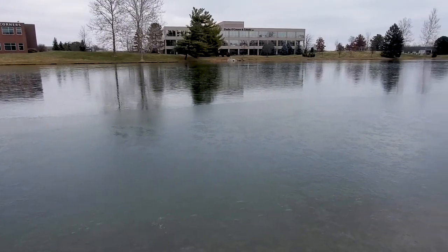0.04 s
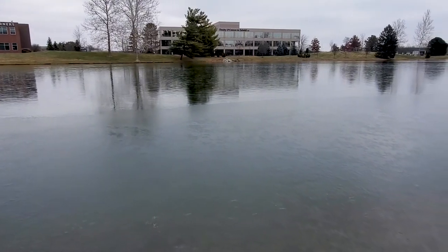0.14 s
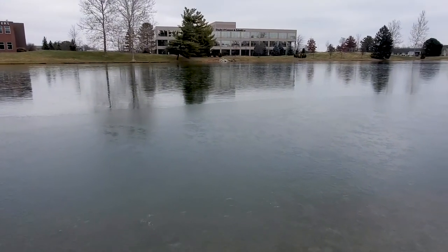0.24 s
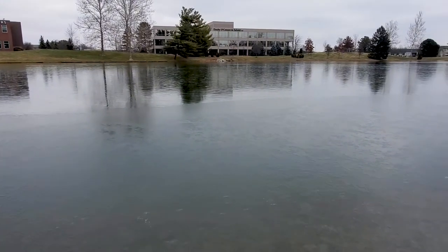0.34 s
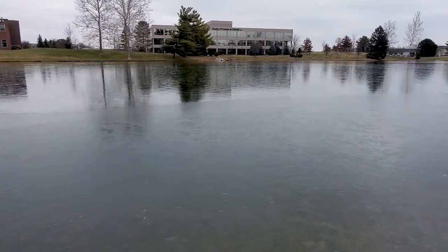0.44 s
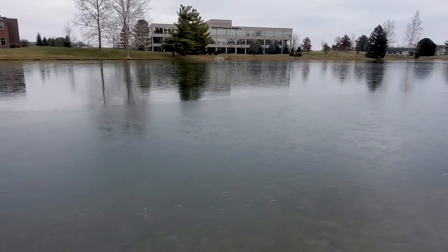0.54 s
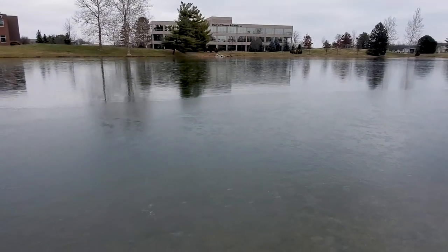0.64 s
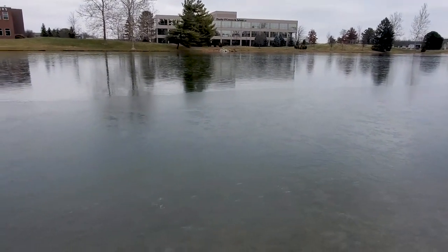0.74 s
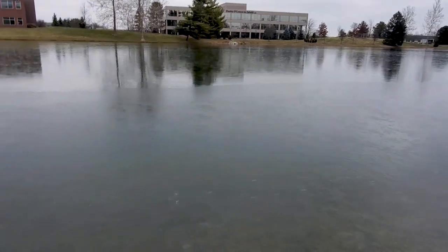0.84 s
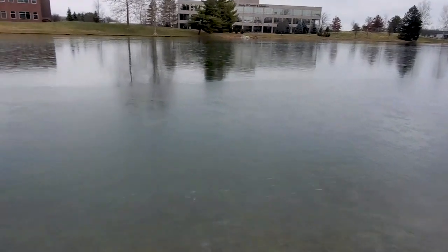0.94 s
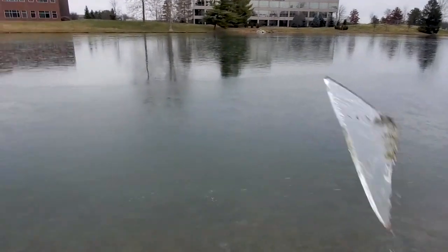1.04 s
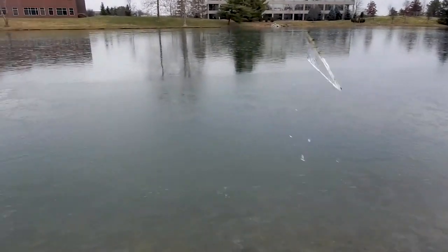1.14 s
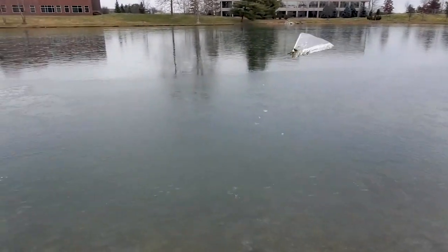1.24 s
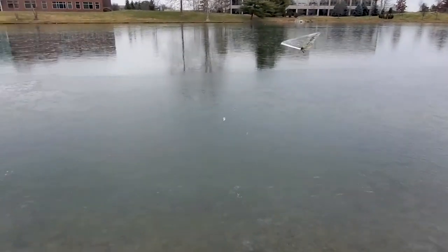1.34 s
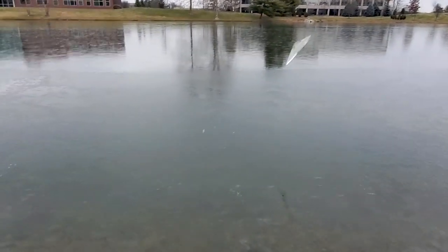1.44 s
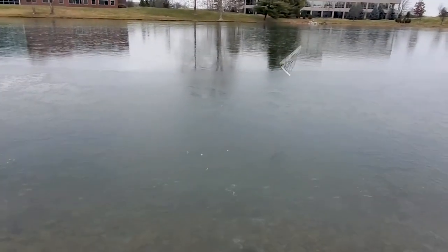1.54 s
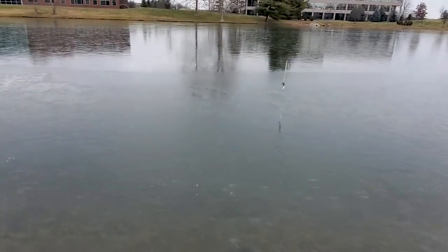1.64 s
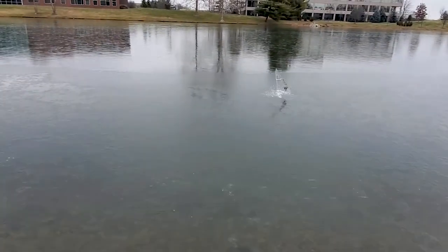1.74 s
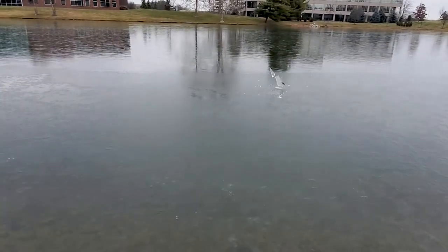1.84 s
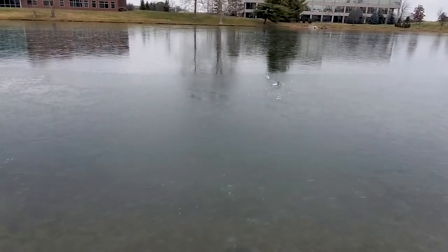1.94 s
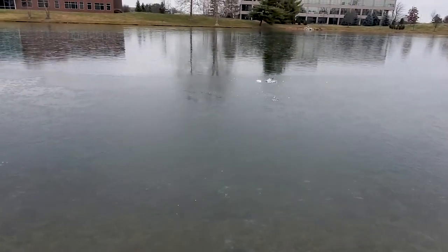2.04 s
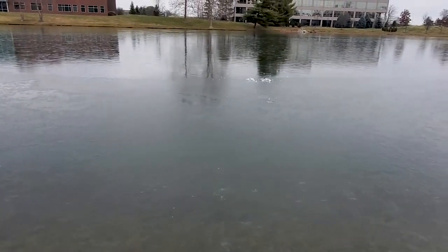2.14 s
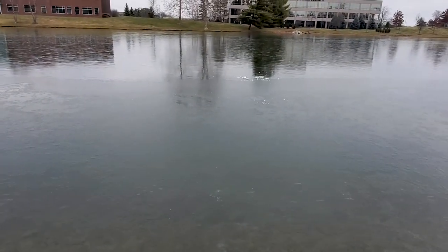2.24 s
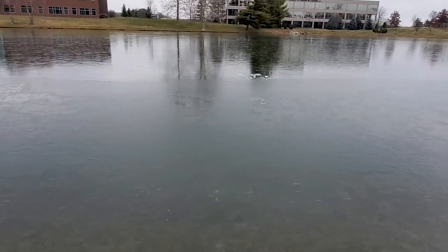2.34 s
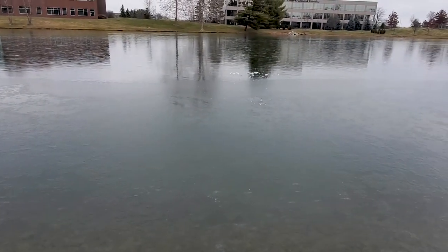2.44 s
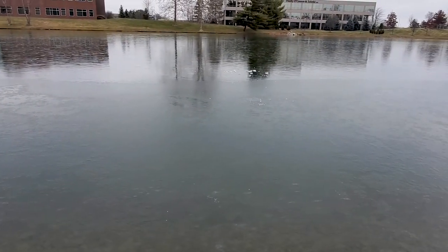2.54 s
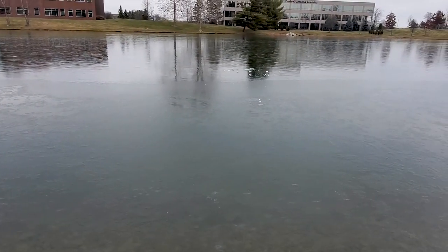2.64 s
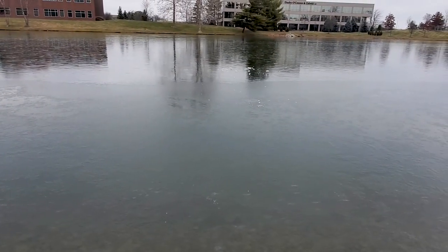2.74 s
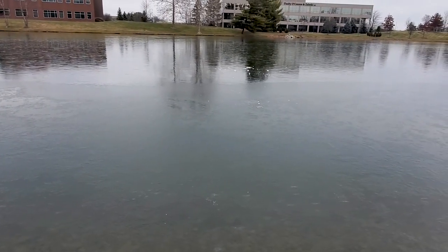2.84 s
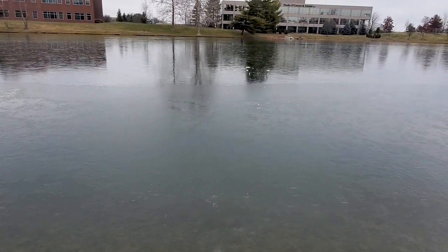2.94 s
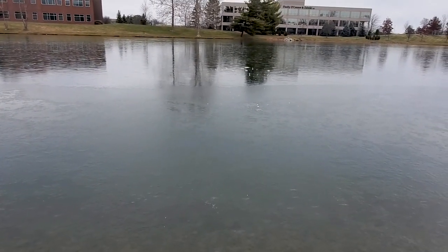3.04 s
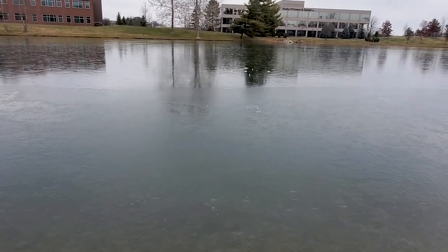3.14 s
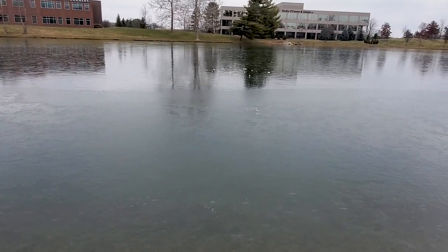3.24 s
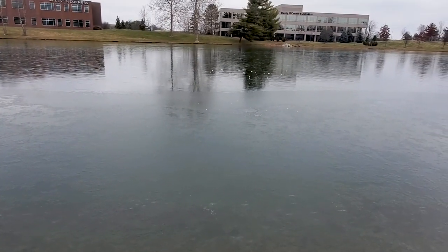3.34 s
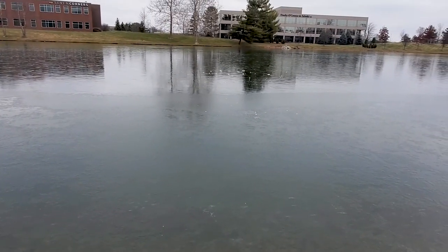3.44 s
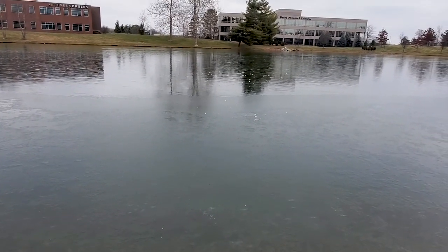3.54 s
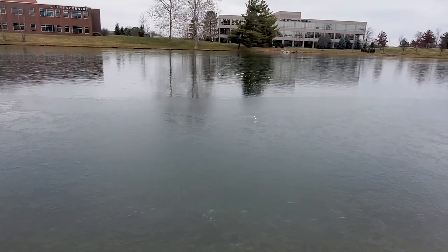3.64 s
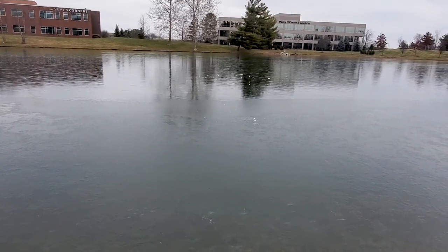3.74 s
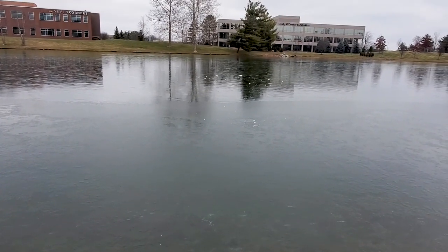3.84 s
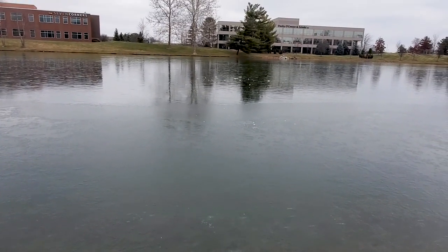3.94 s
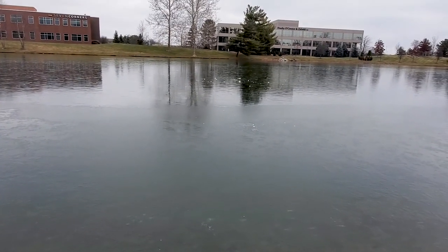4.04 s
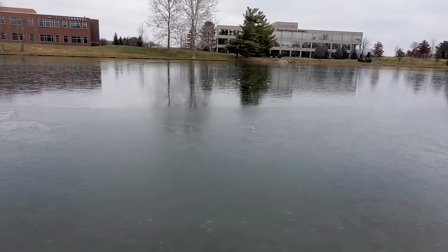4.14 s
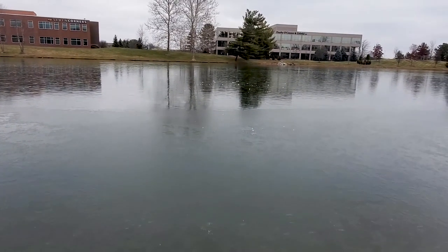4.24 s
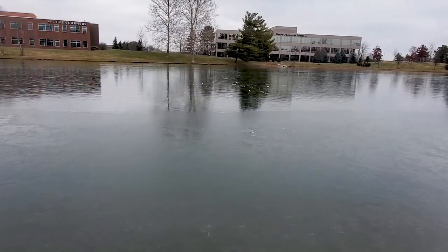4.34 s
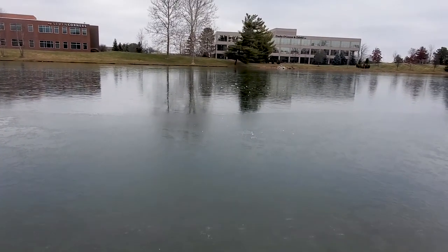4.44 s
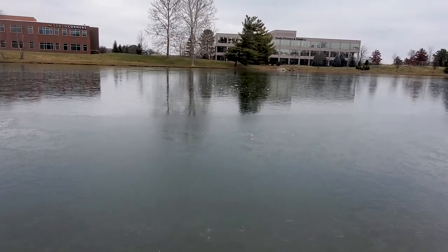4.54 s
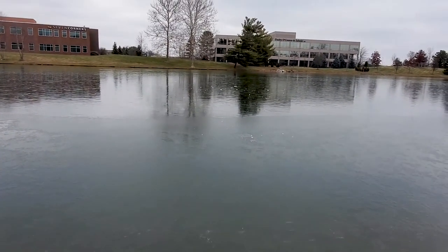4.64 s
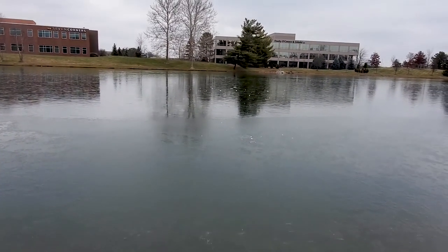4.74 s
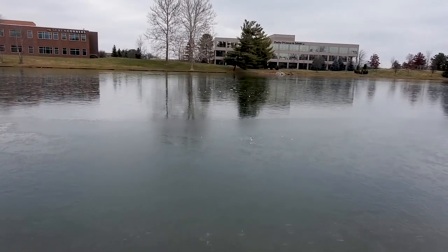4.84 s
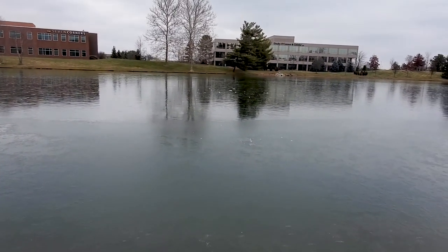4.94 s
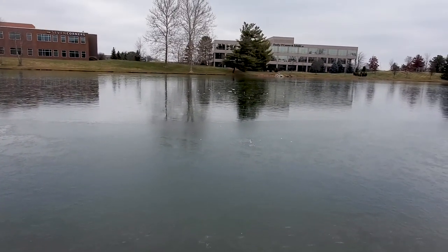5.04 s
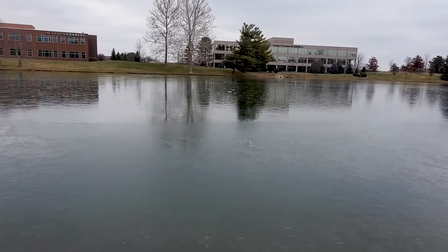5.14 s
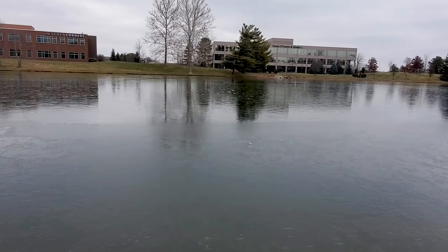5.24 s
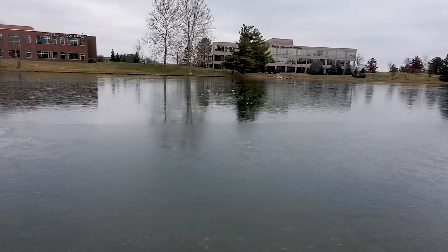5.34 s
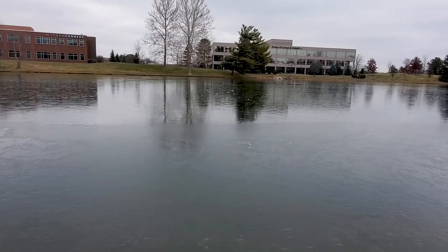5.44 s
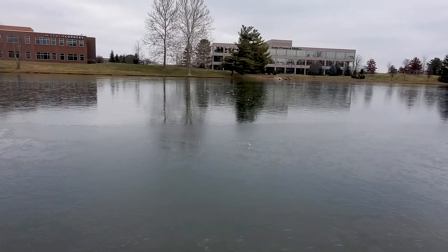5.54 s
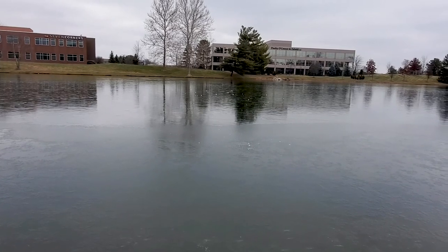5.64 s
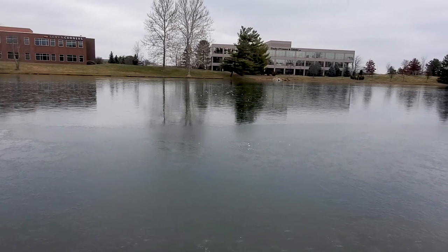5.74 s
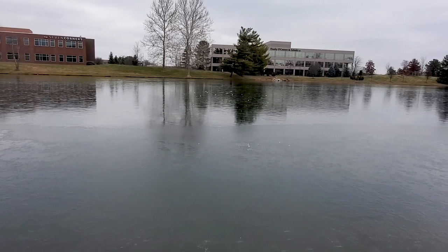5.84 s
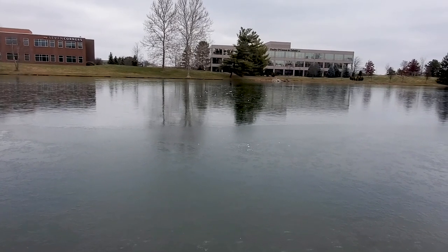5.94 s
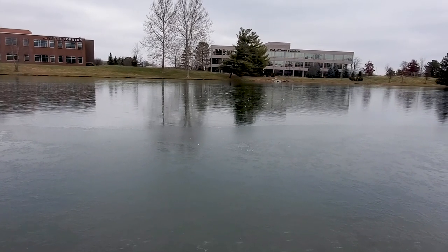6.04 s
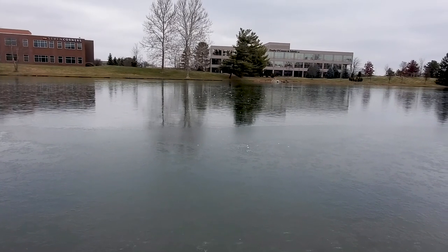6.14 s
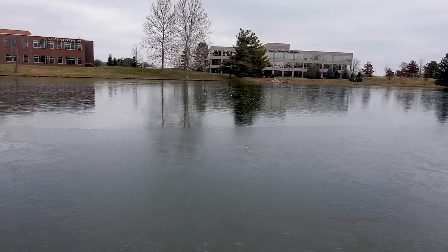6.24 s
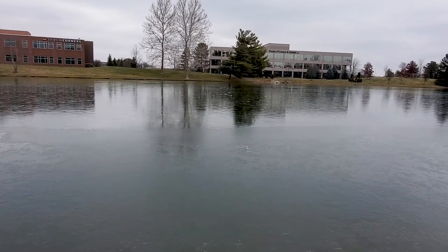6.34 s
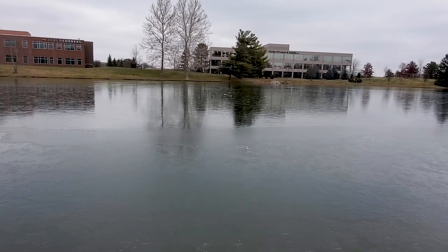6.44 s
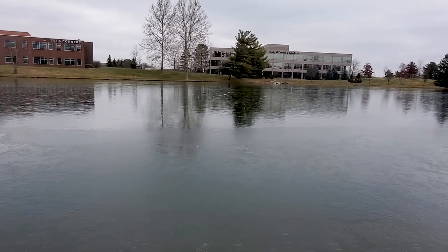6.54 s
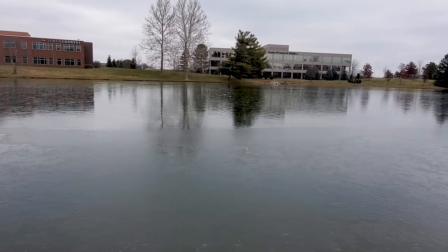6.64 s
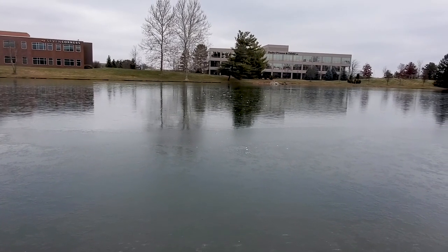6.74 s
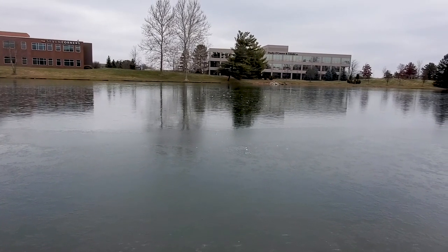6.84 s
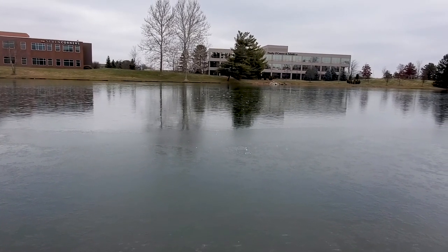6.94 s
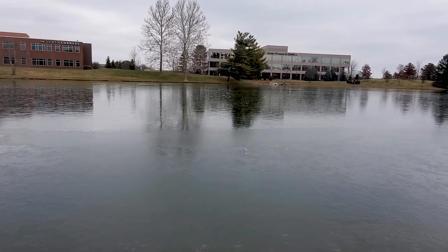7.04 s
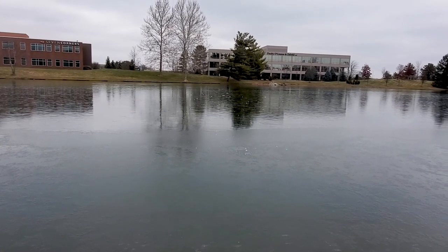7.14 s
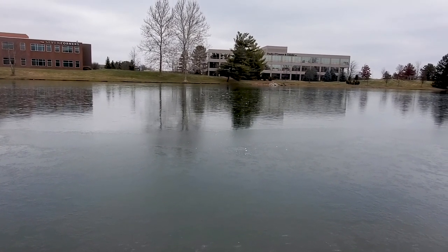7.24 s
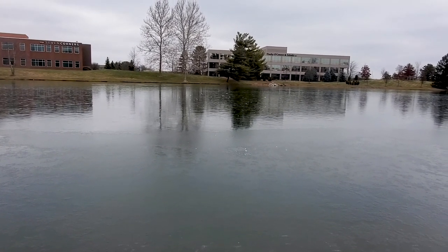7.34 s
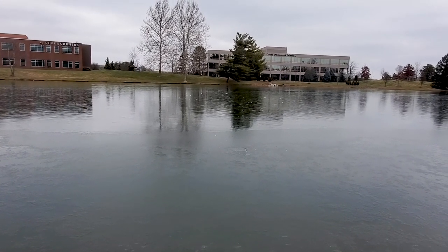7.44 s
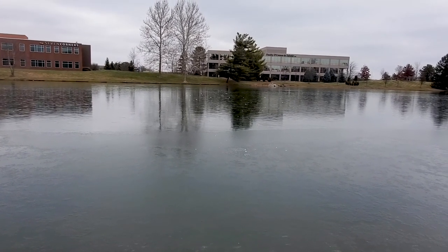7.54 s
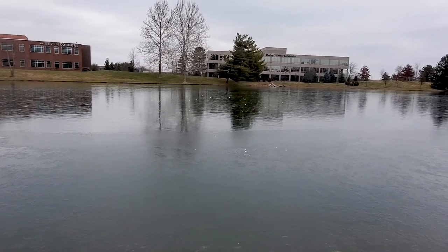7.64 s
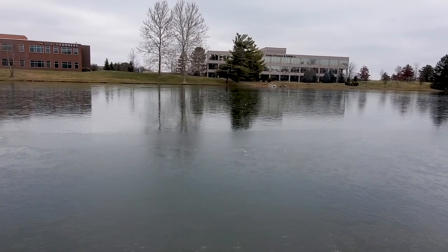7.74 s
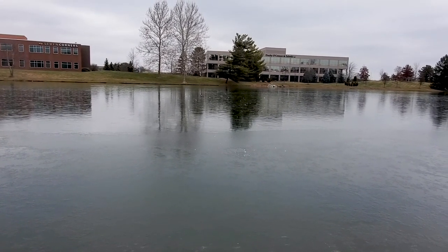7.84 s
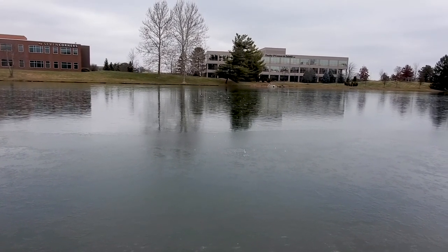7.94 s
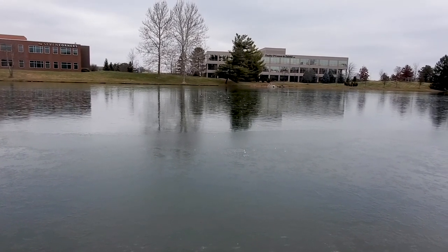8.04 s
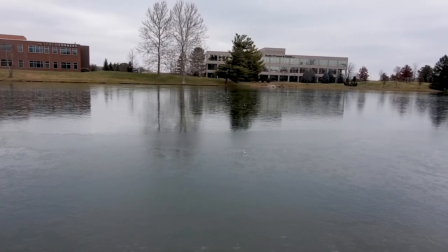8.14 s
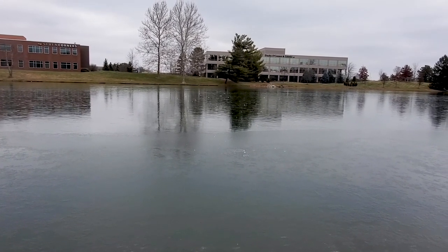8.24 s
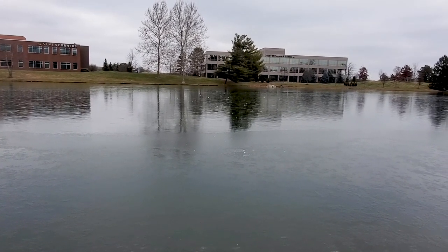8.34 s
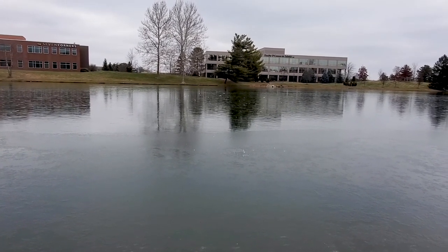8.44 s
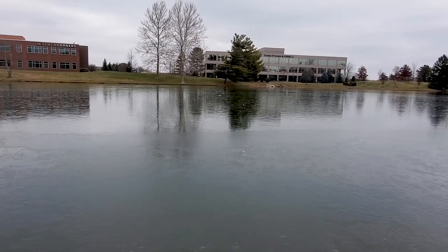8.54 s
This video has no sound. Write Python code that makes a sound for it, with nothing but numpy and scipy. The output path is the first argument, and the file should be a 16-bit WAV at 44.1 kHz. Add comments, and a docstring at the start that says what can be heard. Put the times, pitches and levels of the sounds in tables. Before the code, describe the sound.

A plate of ice is flung with a quick swish close to the microphone. It hits a thinly frozen pond, bounces and shatters in a cluster of sharp clicks and falling chirps. The shards skate away for several seconds, their tiny ticks merging into a high, glassy whir that slowly sinks in pitch and dulls with distance. A low outdoor rumble and faint distant traffic lie underneath.

```python
"""A plate of ice, flung with a swish onto a thinly frozen pond, strikes, bounces, rings and shatters.
Bending waves in the sheet are dispersive and outrun sound in air, so each blow starts with a falling
chirp. The shards skate away for seconds: their countless ticks merge into a whir and a zing that sinks
in pitch, and the slide dulls with distance. Beneath lie a low outdoor rumble and distant traffic."""
import sys
import numpy as np
from scipy import signal
from scipy.fft import rfft, irfft, next_fast_len
from scipy.io import wavfile
from scipy.ndimage import uniform_filter1d, map_coordinates

SR = 44100
rng = np.random.default_rng(int(sys.argv[2]) if len(sys.argv) > 2 else 0)


def log_audio(samples):
    """Write samples as a 16-bit WAV file to the path given in sys.argv[1]."""
    # one column per channel
    frames = np.atleast_2d(samples).T
    # limit to full scale, then quantise
    limited = np.clip(frames, -1, 1)
    pcm = np.round(limited * 32767).astype(np.int16)
    wavfile.write(sys.argv[1], SR, pcm)


N = 378378
TIME = np.arange(N) / SR

# background levels (time [s], rumble [dB], drone [dB], traffic [dB])
BACKGROUND_LEVELS = [(0, -38, -44.5, -48.5), (.95, -36, -29.5, -48), (1.5, -36.5, -34.5, -49.5),
                     (2.1, -44.5, -54, -52), (3, -42, -63, -52), (3.5, -41.5, -43.5, -50),
                     (4.8, -39.5, -43.5, -52), (5.9, -41, -57, -53), (7.5, -40, -47.5, -54),
                     (8.58, -41.5, -51, -53.5)]
# spectrum of the outdoor rumble (frequency [Hz], level [dB])
RUMBLE_SPECTRUM = [(13, -50), (22, -28), (51, -8), (71, 0.5), (84, -2), (139, -15), (193, -16), (400, -34),
                   (520, -40), (880, -120)]
# spectrum of distant traffic (frequency [Hz], level [dB])
TRAFFIC_SPECTRUM = [(100, -7), (250, 3.5), (400, 1), (800, 1), (1200, -4), (2200, -4.5), (3000, -13),
                    (4200, -29), (6000, -28.5), (7200, -46.5), (8200, -31), (10000, -44), (15800, -39)]
# spectrum of the rushing air (frequency [Hz], level [dB])
SWISH_SPECTRUM = [(71, -24), (120, -13), (226, -11), (555, -5), (640, -12), (754, -15), (1180, -16),
                  (1360, -4.5), (1710, -18), (2180, -7.5), (2570, -12), (3020, -11), (6980, -24.5),
                  (11600, -28), (15800, -42)]
# resonances of the swish (frequency [Hz], bandwidth [Hz], relative level [dB])
SWISH_RESONANCES = [(214, 55, -9), (628, 6.8, -7.5), (1250, 13, -21)]
# blows of the plate, then its shards, in relative levels (time [s], click [dB], splinter [dB], chirp [dB])
BLOWS = [(1.7504, -10, -19, -4), (1.7535, -15, -34, -6.5), (1.7585, -10, -27, -15),
         (1.809, -51, -56, -17.5), (1.832, -37, -62, -21), (1.8646, -35.5, -46, -32),
         (1.903, -27.5, -39, -15), (1.9143, -20.5, -36, -4.5), (1.9481, -29, -31, -13),
         (1.99, -16.5, -31, -9.5), (2.012, -21, -33, -25), (2.024, -13.5, -27, -20),
         (2.0294, -10.5, -28, -12), (2.0435, -17, -28, -6.5), (2.0707, -29, -35, -13),
         (2.0805, -20, -40, -11), (2.0856, -10, -36, -0.5), (2.0903, -15.5, -33.5, 0),
         (2.093, -24, -29, -10), (2.1122, -43, -32, -26), (2.1286, -21.5, -38, -18.5),
         (2.165, -34.5, -46, -14.5), (2.176, -21.5, -29, -7), (2.206, -43, -37, -9),
         (2.298, -26.5, -50.5, -12), (2.347, -28, -52.5, -14.5), (2.857, -41, -54, -14),
         (3.364, -46, -35, -27), (3.554, -24, -43, -15), (3.858, -40, -46, -8.5), (4.058, -32, -59, -10.5),
         (4.391, -27, -57, -13), (4.863, -41, -58, -10), (4.928, -45.5, -58, -8.5),
         (5.152, -42, -65, -11.5), (6.722, -26, -59, -33), (7.955, -30.5, -75, -30.5)]
# spectrum of the ice-borne chirp (frequency [Hz], level [dB])
CHIRP_SPECTRUM = [(1400, -78.5), (1950, -45), (2250, -3), (2550, -11), (2950, -16.5), (3300, -51),
                  (4500, -100)]
# spectrum of the airborne click (frequency [Hz], level [dB])
CLICK_SPECTRUM = [(100, -30.5), (400, -10), (1200, 0), (2000, 10.5), (3400, 10.5), (4400, 1.5), (6000, -5),
                  (8000, -18), (16000, -60)]
# spectrum of splintering ice (frequency [Hz], level [dB])
SPLINTER_SPECTRUM = [(2000, -30), (5500, -38), (8000, -11), (10000, 8), (12500, 15.5), (16000, 9)]
# single shards clinking as the plate breaks (time [s], frequency [Hz], level [dB])
BREAK_CLINKS = [(1.758, 4330, -15.5), (1.9267, 6300, -37), (1.927, 4900, -40), (1.994, 5100, -32),
                (2.067, 7250, -32), (2.128, 3450, -24.5), (2.162, 4500, -21.5), (2.18, 6850, -30.5),
                (2.232, 4500, -26.5), (2.238, 1410, -26)]
# ringing of the plate between bounces (time [s], relative level [dB], T60 [s])
PLATE_RINGS = [(1.7595, -29, 0.051), (1.949, -39, .4), (1.9935, -24.5, 0.12), (2.0245, -26, 0.085)]
# normal modes of the plate (frequency [Hz], relative level [dB])
PLATE_MODES = [(765, -5), (858, -0.5), (1425, 6.5), (1520, -11.5), (2165, 5), (2655, 8), (3560, -13),
               (4910, -29), (5150, -6)]
# how hard the shards chatter on the ice (time [s], relative level [dB])
CHATTER_LEVELS = [(2.2, 0), (2.47, -4), (2.85, -2), (3.25, -2.5), (3.9, 4), (4.45, 1), (5.2, 3.5),
                  (5.7, 0.5), (6.8, .3), (7.2, -2), (7.9, -1), (8.58, -2)]
# spectrum radiated by the tapped sheet (frequency [Hz], level [dB])
WHIR_SPECTRUM = [(600, -19.5), (1200, -13.5), (1850, -3.5), (2060, 3), (2230, 15), (2500, 11), (3000, 5.5),
                 (3600, -7), (4500, -58), (6000, -88)]
# spectrum of the dry ticks (frequency [Hz], level [dB])
GRIT_SPECTRUM = [(1200, -46.5), (2200, 11.5), (2900, -0.5), (3500, 4), (4400, 0), (5500, -18.5),
                 (7000, -43), (8500, -43), (11000, -57.5)]
# spectrum of the crumbs (frequency [Hz], level [dB])
FIZZ_SPECTRUM = [(2000, -8), (5000, 17.5), (7200, 6.5), (8200, -3), (10000, -5.5), (11500, -1.5),
                 (12200, 1.5), (13000, 0.5), (15800, -1)]
# brief rattles of a wobbling large shard (time [s], width [s], relative level [dB])
RATTLE_SWELLS = [(2.202, 0.39, -41), (3.22, 0.11, -47.5), (3.864, 0.014, -41), (4.006, 0.1, -43),
                 (4.732, .05, -41.5), (4.893, 0.02, -46), (5.2, 0.17, -45.5), (5.956, 0.05, -48),
                 (6.224, 0.056, -43), (6.73, .04, -47), (7.452, 0.24, -54.5), (8.004, 0.025, -48)]
# modes of the large shards (frequency [Hz], bandwidth [Hz], relative level [dB])
LARGE_SHARD_MODES = [(1196, 32, 16.5), (1386, 84, 21), (1670, 120, 13.5)]
# filter on the rattle (frequency [Hz], gain [dB])
RATTLE_FILTER = [(900, -29), (1200, -5.5), (2000, 6), (5000, -37)]
# pitches near which the small shards tinkle (frequency [Hz], level [dB])
TINKLE_PITCHES = [(3500, -41.5), (4200, -43), (7050, -45.5), (9200, -57.5), (12250, -50.5), (14000, -58)]
# the two microphone ports (frequency [Hz], left minus right [dB], coherence [0-1], left lead [rad])
PORT_RESPONSE = [(300, -3, 0.83, 0.17), (1390, 12, 0.75, 1), (2390, 14.5, 0.52, 0.12),
                 (4000, 12.5, 0.64, 0.88), (6260, 12.5, 0.4, -1.76), (9200, -1, .5, -2.2),
                 (12600, 16.5, .25, -0.8)]

BREAK_S, BREAK_M, SKATE_M_PER_S = 2.05, 8.23, 3.62  # the shards skate away from the break
REACH_HZ = 8070  # highest pitch that the ice carries back from the break
BAND_LIMIT_HZ = 15850


def amp(db):
    """Amplitude ratio of a level in decibels."""
    return 10 ** (np.asarray(db) / 20)


def unit(x):
    """Normalisation to rms 1."""
    return x / np.sqrt(np.mean(x ** 2) + 1e-20)


def crest(x, size=66):
    """Normalisation of the loudest moment to rms 1."""
    return x / np.sqrt(np.max(uniform_filter1d(x ** 2, size)) + 1e-20)


def along(points, hz):
    """Interpolation of a table's columns on a log-frequency axis."""
    knots_hz, *columns = np.transpose(points)
    return np.squeeze([np.interp(np.log(hz + 1), np.log(knots_hz + 1), c) for c in columns])


def curves(rows):
    """Linear interpolation of a table's columns over time."""
    knots_s, *columns = np.transpose(rows)
    return [np.interp(TIME, knots_s, c) for c in columns]


def swell(s, width_s):
    """Gaussian envelope centred on s seconds."""
    return np.exp(-2 * ((TIME - s) / width_s) ** 2)


def wobble(rate):
    """Smooth random modulation, rate knots a second."""
    return map_coordinates(rng.standard_normal(int(N * rate / SR) + 4), [TIME * rate])


def filtered(x, response):
    """Linear filtering by a complex frequency response."""
    n = x.shape[-1]
    size = next_fast_len(n + 8192)
    return irfft(rfft(x, size) * response(np.fft.rfftfreq(size, 1 / SR)), size)[..., :n]


def coloured(x, spectrum):
    """Zero-phase filtering by a tabulated spectrum."""
    return filtered(x, lambda hz: amp(along(spectrum, hz)))


def resonate(x, modes):
    """Forced response of damped resonators in parallel."""
    return filtered(x, lambda hz: sum(
        amp(db) * 1j * hz * width / (centre ** 2 - hz ** 2 + 1j * hz * width)
        for centre, width, db in modes))


def add(track, s, sound):
    """Superposition of a sound on the track at s seconds."""
    part = track[max(round(s * SR), 0):][:len(sound)]
    part += sound[:len(part)]


def outdoors(gust_db=1.5, drone_hz=71):
    """Random modulation makes a low rumble, a drone and the hush of distant traffic waver."""
    def stereo_noise(spectrum, side_db):
        mid, side = coloured(rng.standard_normal((2, N)), spectrum)
        return unit(np.array([mid + amp(side_db) * side, mid - amp(side_db) * side]))
    rumble_db, drone_db, traffic_db = curves(BACKGROUND_LEVELS)
    rumble = amp(rumble_db + gust_db * wobble(7)) * stereo_noise(RUMBLE_SPECTRUM, side_db=-18.5)
    drone = amp(drone_db + 2.8 * wobble(22))
    drone *= np.sin(2 * np.pi * np.cumsum(drone_hz + 2.674 * wobble(11)) / SR)
    traffic = amp(traffic_db + 0.88 * wobble(2.055)) * stereo_noise(TRAFFIC_SPECTRUM, side_db=-2)
    return rumble + drone + traffic


def swish(wind_up_s=.68, release_s=.993, pass_s=.014, flick_s=.0057, body_lag_s=.0095):
    """Spreading loss: sleeve and plate rush by, loudest when nearest, with a bright flick at release."""
    def passing(s):
        return amp(-31.5) * (TIME > wind_up_s) / (1 + ((TIME - s) / pass_s) ** 2) ** 0.69
    rush = passing(release_s) * unit(coloured(rng.standard_normal((2, N)), SWISH_SPECTRUM))
    body = passing(release_s + body_lag_s) * unit(resonate(rng.standard_normal(N), SWISH_RESONANCES))
    hiss = unit(coloured(rng.standard_normal((2, N)), SPLINTER_SPECTRUM))
    flick = amp(-31) / (1 + ((TIME - release_s) / flick_s) ** 2) * hiss
    return (rush + flick) * amp([[1.5], [-3]]) + body  # louder on the left


def distance(s):
    """Uniform motion: metres from the microphone to the ice sounding at s seconds."""
    return BREAK_M + SKATE_M_PER_S * np.maximum(s - BREAK_S, 0)


def bending(hz, travel_s, centre_hz=2250):
    """Dispersion: speed grows as the root of frequency. Delays are relative to travel_s at centre_hz."""
    return np.exp(-2j * np.pi * travel_s * (2 * np.sqrt(centre_hz * hz) - hz))


def blows(size=4096, snap_t60=.016, tail_t60=.2, tail_db=-21, lead_s_per_m=.00055):
    """Two-path propagation: a chirp arrives through the ice, then a click and crack through the air."""
    out, t, hz = np.zeros(N), np.arange(size) / SR, np.fft.rfftfreq(size, 1 / SR)
    decay = amp(-60 * t / snap_t60) + amp(tail_db - 60 * t / tail_t60)

    def burst(spectrum):
        noise = np.pad(decay * rng.standard_normal(size), (size, 0))
        return crest(coloured(noise, spectrum))
    for s, click_db, splinter_db, chirp_db in BLOWS:
        dispersed = amp(along(CHIRP_SPECTRUM, hz)) * bending(hz, rng.uniform(.025, .036))
        chirp = amp(chirp_db - 10) * crest(np.fft.fftshift(irfft(dispersed)))
        add(out, s - lead_s_per_m * distance(s) - size / SR / 2, chirp)
        crack = amp(click_db) * burst(CLICK_SPECTRUM) + amp(splinter_db) * burst(SPLINTER_SPECTRUM)
        add(out, s - size / SR, crack)
    return out


def clinks(rows, t60=0.046, detuning=.04, attack_s=.00075):
    """Beating: a freed shard rings briefly in a close pair of modes."""
    out, t = np.zeros(N), np.arange(SR // 8) / SR
    for s, hz, db in rows:
        partner_hz = hz * (1 + detuning * rng.standard_normal())
        tones = np.sin(2 * np.pi * hz * t) + .5 * np.sin(2 * np.pi * partner_hz * t)
        add(out, s, amp(db - 60 * t / t60) * (1 - np.exp(-t / attack_s)) * tones)
    return out


def plate(sharpness=0.037, settle_s=0.012, dulling=0.25, attack_s=0.00088):
    """Free vibration: the plate's modes start a little sharp and settle as it lifts off the pond."""
    out, t = np.zeros(N), np.arange(SR // 3) / SR
    warped_t = t + sharpness * settle_s * (1 - np.exp(-t / settle_s))
    hardest_db = max(db for s, db, t60 in PLATE_RINGS)
    for s, db, t60 in PLATE_RINGS:
        tilt_db_per_octave = dulling * (db - hardest_db)  # gentle touches ring duller
        ring = np.zeros(len(t))
        for hz, mode_db in PLATE_MODES:
            gain = amp(mode_db + tilt_db_per_octave * np.log2(hz / PLATE_MODES[0][0]) + rng.normal(0, 3.6))
            ring += gain * np.sin(2 * np.pi * (hz * warped_t + rng.random()))
        add(out, s, amp(db - 60 * t / t60) * (1 - np.exp(-t / attack_s)) * ring)
    return out


def ticks(rate, spread_db):
    """Shot noise: random tiny impacts of uneven strength, on average rate a second."""
    sizes = amp(spread_db * np.clip(rng.standard_normal(N), -2, 2)) * rng.choice([-1, 1], N)
    return unit(sizes * (rng.random(N) < rate / SR))


def glassy(x, t60, ring):
    """Modal overlap: the shards' many close modes prolong each tick like decaying noise."""
    t = np.arange(SR // 10) / SR
    modes = amp(-60 * t / t60) * rng.standard_normal(len(t))
    return unit(x + ring * signal.fftconvolve(x, modes / np.linalg.norm(modes))[:N])


def reach(metres):
    """Absorption: the highest pitch that the ice carries back falls with the root of distance."""
    return REACH_HZ * np.sqrt(BREAK_M / metres)


def receding(taps, response, size=8192):
    """Time-varying filtering: response(hz, metres), at unit power gain, follows the departing shards."""
    out, hz, step = np.zeros(N), np.fft.rfftfreq(size, 1 / SR), size // 16
    for i in range(2 * SR, N, step):
        colour = response(hz, distance(i / SR))
        colour = colour / np.sqrt(np.mean(abs(colour) ** 2))
        block = np.pad(taps[i:i + step], (size // 2, 0))
        add(out, (i - size / 2) / SR, irfft(rfft(block, size) * colour))
    return out


def slide_gain(db, loss_db_per_m, build_m=None):
    """Attenuation of the chatter with distance skated, after an optional build-up over build_m."""
    skated_m = distance(TIME) - BREAK_M
    chatter_db, = curves(CHATTER_LEVELS)
    build_up = 1 - np.exp(-skated_m / build_m) if build_m else 1
    return amp(db + chatter_db - loss_db_per_m * skated_m) * build_up


def whir(taps):
    """Coincidence: the sheet radiates best where its bending waves match the speed of sound in air."""
    def path(hz, metres):
        return amp(along(WHIR_SPECTRUM, hz)) * bending(hz, rng.uniform(.015, .05))
    early = np.roll(taps, -SR // 200)  # the ice-borne wave runs 5 ms ahead of the tick
    return slide_gain(-29.5, loss_db_per_m=0.64) * receding(early, path)


def zing(hops, near_width=0.015, far_width=0.096, widen_m=6, scatter=.025):
    """Dispersion makes each hop a falling chirp around the reach, broader and longer from farther away."""
    def path(hz, metres):
        top_hz = reach(metres) * np.exp(scatter * rng.standard_normal())  # some shards are nearer
        width = far_width + (near_width - far_width) * np.exp(-(metres - BREAK_M) / widen_m)
        offset = np.log((hz + 1) / top_hz) / width
        peak = (1 + offset ** 2 / 2) ** -1.7
        low_pass = 1 / (1 + (hz / (1.22 * top_hz)) ** 18)
        travel_s = np.sqrt(metres / BREAK_M) * rng.uniform(.03, .1)
        return low_pass * peak * bending(hz, travel_s, top_hz)
    ringing = glassy(hops, t60=.025, ring=0.61)
    return slide_gain(-38, loss_db_per_m=0.06, build_m=8.9) * receding(ringing, path)


def grit(scrape):
    """High-frequency loss: the shards' own dry ticks grow dull above the reach."""
    def path(hz, metres):
        loss_db = 85 * np.maximum(np.log((hz + 1) / reach(metres)), 0)
        return amp(along(GRIT_SPECTRUM, hz) - loss_db)
    ringing = glassy(scrape, t60=0.018, ring=0.64)
    return slide_gain(-32.5, loss_db_per_m=0.34, build_m=0.59) * receding(ringing, path)


def fizz(scrape, spray_db=1.5, spray_t60=0.19, rest_s=7.27, rest_db_per_s=6):
    """Incoherent summation: crumbs merge into a fizz that sprays at the break and at last dies away."""
    age = np.maximum(TIME - BREAK_S, 0)
    spray = 1 + amp(spray_db - 60 * age / spray_t60)
    flicker = amp(1.9 * wobble(40))
    moving = amp(-rest_db_per_s * np.maximum(TIME - rest_s, 0))
    crumbs = glassy(scrape + rng.standard_normal(N), t60=.06, ring=0.45)
    envelope = slide_gain(-41, loss_db_per_m=0.87) * spray * flicker * moving
    return envelope * unit(coloured(crumbs, FIZZ_SPECTRUM))


def rattle():
    """Impact excitation: taps drive the modes of the large shards, harder whenever one wobbles."""
    envelope = slide_gain(-51, loss_db_per_m=-0.03)
    envelope += sum(amp(db) * swell(s, width_s) for s, width_s, db in RATTLE_SWELLS)
    ringing = unit(resonate(ticks(rate=780, spread_db=8), LARGE_SHARD_MODES))
    return coloured(envelope * ringing, RATTLE_FILTER)


def slide(scatter_s=.15):
    """Contact excites both bodies: the sheet whirs and zings; the shards tick, fizz and rattle."""
    taps = ticks(rate=600, spread_db=4.7)
    hops = ticks(rate=380, spread_db=5.5)
    sheet = whir(taps) + zing(hops)
    scrape = unit(taps + hops + ticks(rate=5000, spread_db=3))
    shards = grit(scrape) + fizz(scrape) + rattle()
    return (sheet + shards) * np.clip((TIME - BREAK_S) / scatter_s, 0, 1)


def tinkling(count=90, loss_db_per_m_per_octave=0.37, lossless_hz=3400):
    """Absorption fades the highest small shards fastest; returns their random clinks as rows."""
    rows = []
    for hz, db in TINKLE_PITCHES:
        s = rng.uniform(BREAK_S, N / SR, count)
        pitch, strength = rng.standard_normal((2, count))
        loss_db = loss_db_per_m_per_octave * np.log2(hz / lossless_hz) * (distance(s) - BREAK_M)
        rows += zip(s, hz + 160 * pitch, db - loss_db + 3 * strength)
    return rows


def whine(hz=520, db=-61, s=7.9, width_s=0.66):
    """Random frequency modulation makes a faint, passing tone unsteady."""
    phase = 2 * np.pi * np.cumsum(hz + 5 * wobble(6.1)) / SR
    return amp(db) * swell(s, width_s) * np.sin(phase)


def ports(left, size=256):
    """Partial coherence: the right port hears the pond mostly weaker, phase-shifted and part scattered."""
    frames = signal.stft(left, nperseg=size)[2]
    scrambled = frames * np.exp(2j * np.pi * rng.random(frames.shape))
    scattered = left.std() * unit(signal.istft(scrambled, nperseg=size)[1][:N])

    def shares(hz):
        drop_db, coherence, lead = along(PORT_RESPONSE, hz)
        coherence = np.clip(coherence, 0, 1)
        return amp(-drop_db) * np.array([coherence * np.exp(-1j * lead), np.sqrt(1 - coherence ** 2)])
    right = filtered(np.array([left, scattered]), shares).sum(axis=0)
    return np.array([left, right])


def scene():
    """Superposition of the throw, the blows and the sliding shards in the open air."""
    pond = blows() + plate() + clinks(BREAK_CLINKS + tinkling()) + slide()
    return ports(pond) + swish() + outdoors() + whine()


def record(dry):
    """Hard clipping at full scale, then an ideal low-pass at the band limit."""
    return filtered(np.clip(dry, -1, 1), lambda hz: hz < BAND_LIMIT_HZ)


dry = scene()
out = record(dry)
log_audio(out)
```